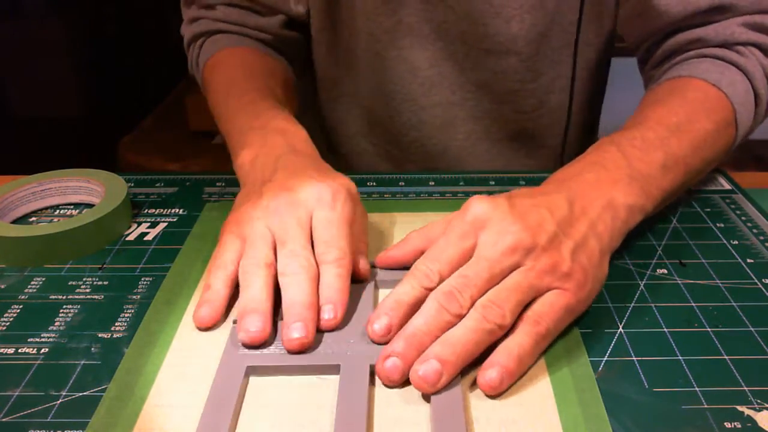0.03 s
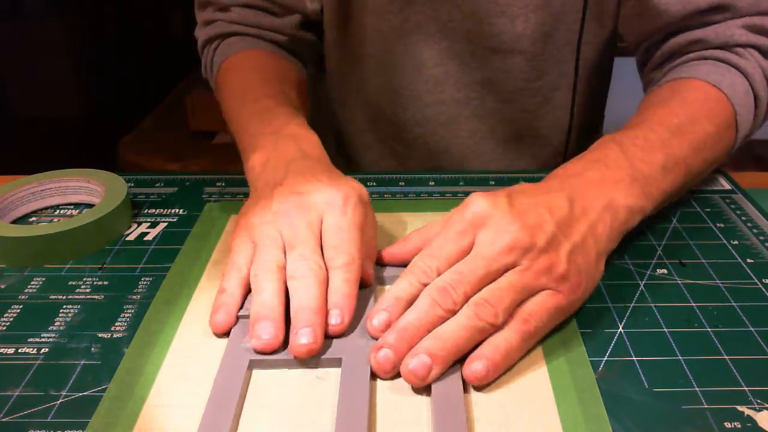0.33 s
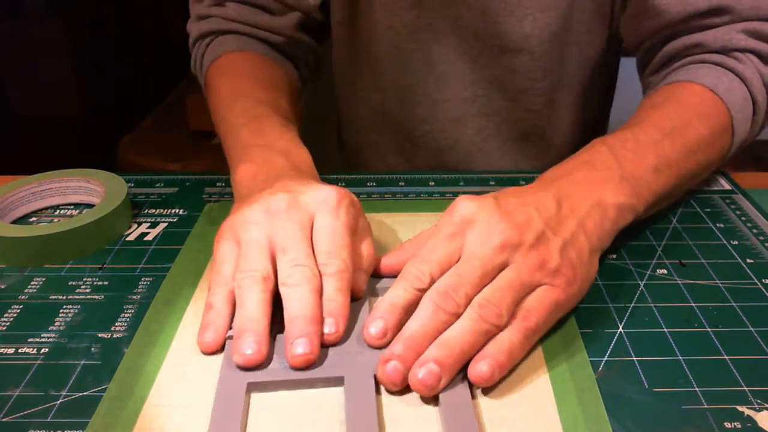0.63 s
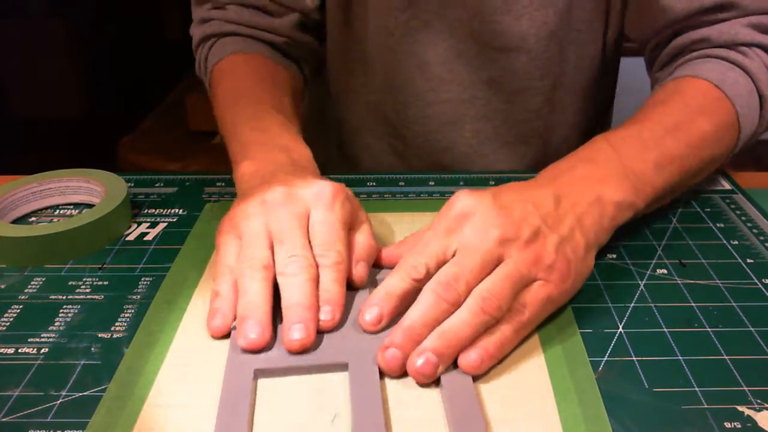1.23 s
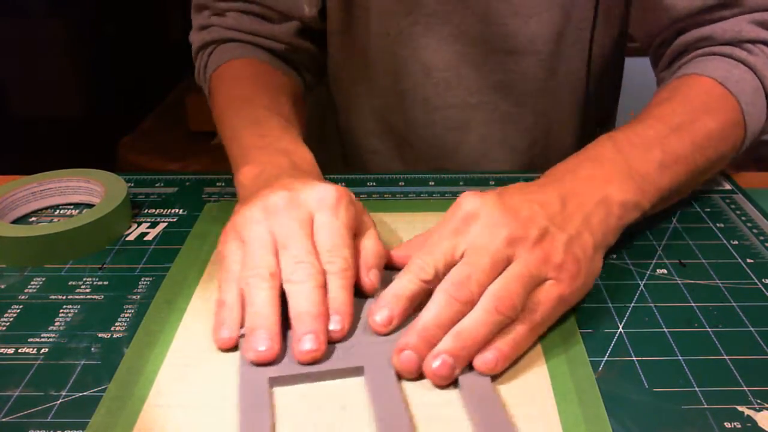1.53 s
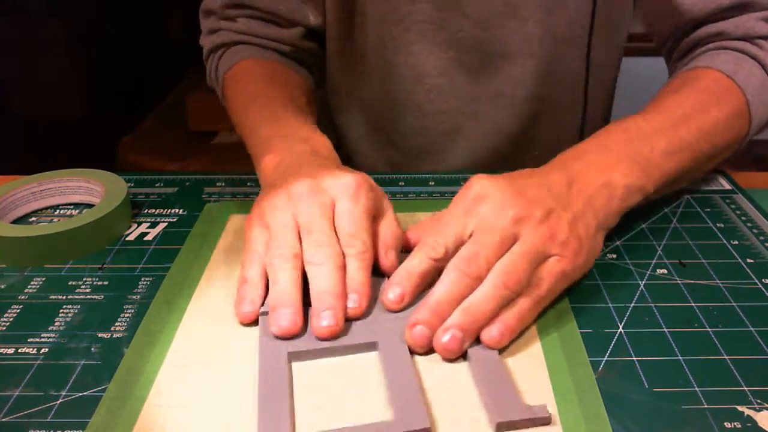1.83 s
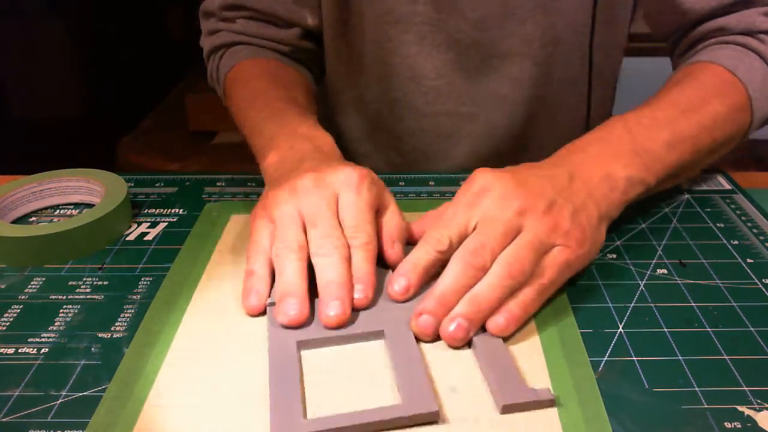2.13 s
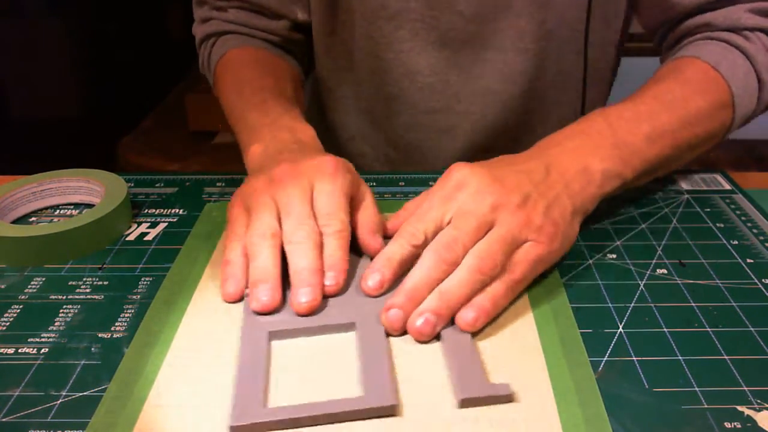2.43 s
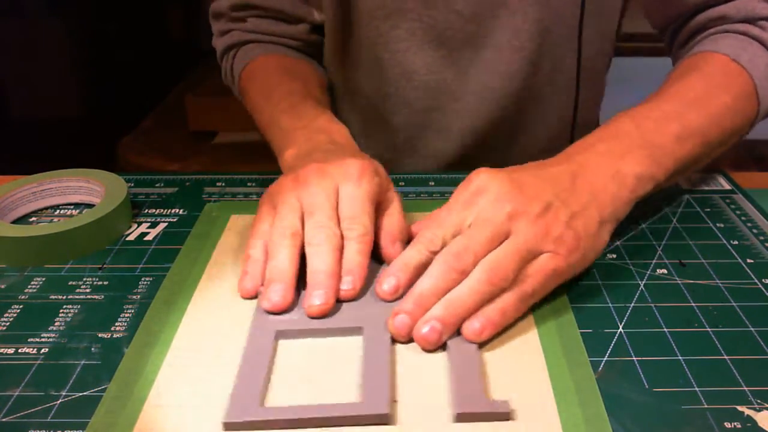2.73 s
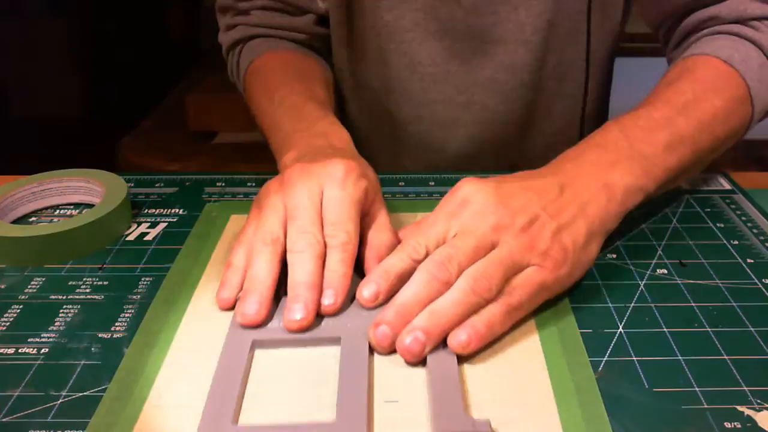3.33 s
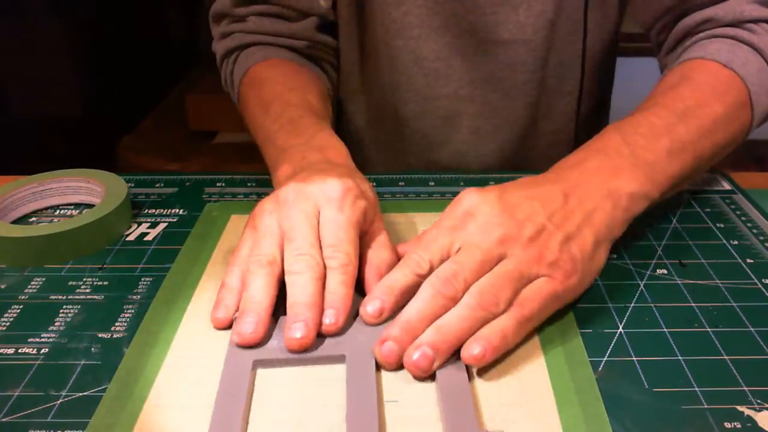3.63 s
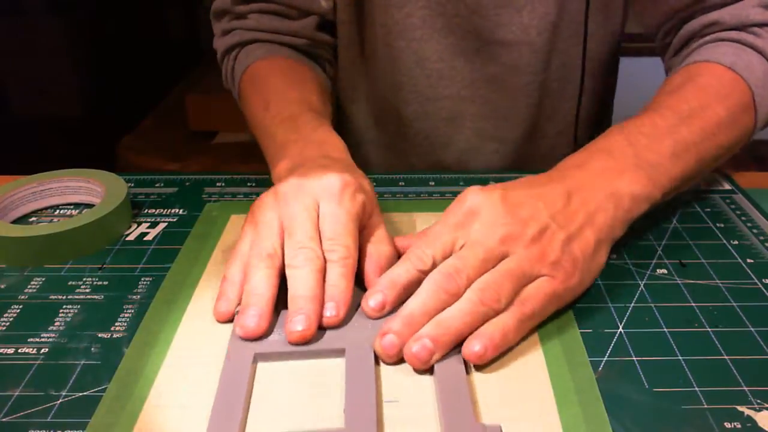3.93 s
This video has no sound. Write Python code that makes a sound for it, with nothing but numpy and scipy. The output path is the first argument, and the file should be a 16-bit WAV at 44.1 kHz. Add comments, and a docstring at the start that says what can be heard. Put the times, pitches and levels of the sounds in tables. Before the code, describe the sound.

Plastic parts rubbed back and forth on sandpaper in quick, short, rasping strokes.

```python
"""Two plastic model parts are pushed to and fro on sandpaper taped to a desk, about seven strokes a second.
Grit catches the plastic and makes it ring under the fingers; midway the hands fall out of step and the
strokes overlap. Now and then an edge snags with a tick, and dull low thuds sound under some strokes.
Behind it lies a small room with a faint hum and a thin high whine.
The close mono microphone overloads on the hardest strokes."""
import sys
import numpy as np
from scipy import signal
from scipy.fft import rfft, irfft
from scipy.io import wavfile
from scipy.ndimage import map_coordinates

SR = 44100
rng = np.random.default_rng(int(sys.argv[2]) if len(sys.argv) > 2 else 0)


def waveform_to_disk(signal):
    """Save audio, clipped to [-1, 1], as 16-bit WAV at the path in sys.argv[1]."""
    frames = np.transpose(np.atleast_2d(signal))
    scaled = np.clip(frames, -1, 1) * 32767
    samples = np.round(scaled).astype(np.int16)
    wavfile.write(sys.argv[1], SR, samples)


N = 176400


def sanding():
    """Plastic rasps over the paper in firm strokes and light slides; the desk rumbles under the push."""
    # Each row: start in seconds, length in seconds, relative level in dB, place of top speed from 0 to 1,
    # pointedness of the swell, lows, mids and treble in dB, ring pitch in Hz, ring lift in dB.
    strokes = [(0.044, 0.071, -13, 0.57, 1.05, 2.0, -8, -0.0, 720, 13),
               (0.176, 0.1, -5, 0.42, 1.03, 3, -2, -1, 3750, 5.5),
               (0.672, 0.14, -17, 0.51, 0.43, 5.5, -3, 0.5, 2350, 5.5),
               (0.873, 0.13, -12.5, 0.38, 0.56, -4.5, -1.5, -1.5, 1830, 5.5),
               (1.031, 0.12, -12.5, 0.62, 0.88, 0.5, -3, -0.5, 1340, 4.5),
               (1.185, 0.12, -12, 0.54, 0.7, -1, -2, 1, 2130, 3.5),
               (1.33, 0.11, -11.5, 0.51, 0.95, 4.5, -2.5, 0, 1160, 5.5),
               (1.464, 0.12, -11, 0.47, 1.33, -1.5, -4, -1, 1890, 6),
               (1.599, 0.12, -9.5, 0.5, 0.88, 0.0, -3.5, 1.0, 1340, 6),
               (1.712, 0.15, -12, 0.75, 0.97, 1.5, -1, 2.5, 1940, 6.5),
               (1.854, 0.16, -10.5, 0.59, 0.45, 1.5, -5.5, 0.5, 1200, 8.5),
               (1.992, 0.21, -10, 0.1, 1.87, 2, -0.5, 1.5, 2810, 3.5),
               (2.113, 0.17, -8, 0.33, 2.5, 1.5, 3, 1.5, 2780, 5.5),
               (2.241, 0.14, -7, 0.5, 1.44, 2.5, 2, 2.5, 3270, 5.5),
               (2.358, 0.14, -4.5, 0.66, 1.8, -3.5, 4, -0.5, 1370, -3),
               (2.455, 0.096, -14, 0.5, 0.55, 7, -3, 2, 1260, 4),
               (2.51, 0.15, -7.5, 0.51, 2.1, 1, -0.5, 1, 3230, 6.5),
               (2.614, 0.095, -14.5, 0.46, 0.39, 1.5, -2, 2, 1900, 6),
               (2.686, 0.12, -8.5, 0.35, 1.6, 1, 3.5, 1, 2570, 5),
               (2.768, 0.078, -13, 0.4, 1, 7.5, 2, 2, 2130, 8),
               (2.819, 0.096, -10, 0.29, 0.94, 0, -0.5, 1, 1200, 7),
               (2.895, 0.093, -14, 0.3, 0.49, -6.5, -1, 2.5, 3840, 1),
               (2.952, 0.11, -6.5, 0.37, 2.2, -2, -1, -1.5, 2660, 2),
               (3.012, 0.17, -13, 0.74, 0.37, 0.5, 0, 3, 1760, 4),
               (3.16, 0.094, -15.5, 0.45, 0.66, 1, -2, 1.0, 1640, 4),
               (3.259, 0.12, -10, 0.65, 1.3, -1, -5, 1.5, 3800, 0),
               (3.404, 0.11, -9, 0.49, 1.03, -3.0, -3.5, 0.5, 3600, 3.5),
               (3.535, 0.1, -9, 0.56, 1.23, 0.5, -2.5, 1.5, 2010, -2),
               (3.66, 0.11, -9, 0.45, 0.84, -4, -4.5, 0.5, 1810, 4.5),
               (3.773, 0.11, -9.5, 0.61, 1.6, 2.5, -5, 1.5, 2080, 4.5),
               (3.906, 0.095, -10.5, 0.41, 0.6, -1.5, -1, 2.5, 1700, 6)]
    # A part slides, hardly pressed. Each row: start in seconds, length in seconds, relative level in dB.
    slides = [(-.05, 0.1, -26), (.27, 0.044, -42), (.35, .11, -45), (.5, 0.081, -46), (3.62, 0.032, -37.5),
              (3.865, 0.037, -39)]
    # The colour of the shaking desk. Each row: frequency in Hz, relative level in dB.
    desk_spectrum = [(15, -16), (48, -13), (75, -16), (150, 26), (300, -24), (1000, -62)]
    rasp, push = np.zeros((2, N))
    for start, *gesture in list(strokes) + list(slides):
        sound, force = stroke(*gesture)
        add(rasp, start, sound)
        add(push, start, force)
    rumble = np.sqrt(push / 2) * noise(desk_spectrum)
    return amp(-0.5) * rasp + amp(-43.5) * rumble


def stroke(length, level_db, top=0.39, pointedness=1, *colour):
    """Speed rises and falls in an arch while rubbing and grains drive the part. Gives sound and force."""
    size = SR // 4
    grains_per_s, grain_spread_db, fine_share, chatter_depth = 7000, 2.5, 0.82, 0.11
    progress = np.interp(np.arange(size) / SR / length, [0, top, 1], [0, .5, 1])
    speed = np.sin(np.pi * progress).clip(0)
    chance = grains_per_s / SR * (speed + .1)
    grain_sizes = amp(grain_spread_db * np.minimum(rng.exponential(1, size), 5))
    kicks = unit(grain_sizes * rng.choice([-1, 1], size))
    grains = kicks * (rng.random(size) < chance) / np.sqrt(chance)
    grit = np.sqrt(fine_share) * rng.standard_normal(size) + np.sqrt(1 - fine_share) * grains
    press = amp(speed ** 19 - .5)  # the fingers bear down briefly around top speed
    chatter = np.exp(chatter_depth * wander(size, .004 * SR) - chatter_depth ** 2)  # stick and slip
    force = amp(level_db) * press * speed ** pointedness * chatter
    return signal.fftconvolve(grit * force, plastic_ring(*colour)), force


def plastic_ring(low_db=0, mid_db=0, treble_db=0, ring_hz=2000, ring_db=0, soft_hz=SR):
    """How the held plastic answers one grain; each grip shifts its resonances and colours one band."""
    # The broad colour of plastic on paper on the desk. Each row: frequency in Hz, relative level in dB.
    body = [(40, -31), (90, -31), (170, -25), (350, -17), (550, -10.5), (930, -9), (1100, -0.5), (1500, -6),
            (2300, 0.5), (3000, -3.5), (3800, 0), (5000, -5.5), (6200, -13), (7000, -20), (8000, -18),
            (10200, -17), (12000, -23), (15500, -29.5)]
    # The resonances of the parts. Each row: frequency in Hz, width in Hz, lift in dB.
    resonances = [(693, 17, 5), (864, 20, 6.5), (1135, 190, 3), (1381, 88, 8.5), (1745, 396, 5.5),
                  (2640, 600, 3.5), (3430, 205, 5.5), (10060, 600, 1.5)]
    ripple_db, ripple_step_hz, detune = 2.0, 69.7, 0.016  # the grip differs a little in every stroke
    hz = np.fft.rfftfreq(4096, 1 / SR)
    ripple = ripple_db * wander(len(hz), ripple_step_hz / hz[1]) / (1 + hz / 2500)
    db = curve(body, hz) + ripple
    modes = [(centre * (1 + detune * rng.standard_normal()), *rest) for centre, *rest in resonances]
    modes.append((ring_hz, 0.072 * ring_hz, ring_db))
    for centre, width, lift_db in modes:
        peak = 1 / (1 + (2 * (hz - centre) / width) ** 2)
        db += 10 * np.log10(1 + (amp(lift_db) ** 2 - 1) * peak)
    low = 1 / (1 + (hz / 790) ** 6)
    mid = np.exp(-(np.log2((hz + 1) / 1230) / 0.26) ** 2)
    treble = 1 - 1 / (1 + (hz / 4170) ** 8)
    dull_db = 10 * np.log10(1 + (hz / soft_hz) ** 4)
    return impulse_response(db + low_db * low + mid_db * mid + treble_db * treble - dull_db)


def snags():
    """An edge catches on a coarse grain: a very short burst of slips knocks the part."""
    # Each row: time in seconds, relative level in dB.
    catches = [(0.1109, -5), (0.186, -1.5), (.27, -11), (.51, -20), (.5135, -14), (.663, -25),
               (0.6764, -22), (1.873, -2), (1.978, -7), (2.815, -4), (2.918, -5)]
    out, t = np.zeros(N), np.arange(SR // 100) / SR
    for start, db in catches:
        burst = rng.standard_normal(len(t)) * np.exp(-t / 0.002)
        ring = plastic_ring(low_db=-9, mid_db=-9, treble_db=-3.5, ring_hz=1890, ring_db=4.5, soft_hz=7100)
        tick = signal.fftconvolve(burst, ring)
        add(out, start, amp(db + 13.5) * tick / np.linalg.norm(tick))
    return out


def low_thuds():
    """Short, dull low thuds sound under some strokes, strongest on the hardest ones."""
    # Each row: centre in seconds, length in seconds, pitch in Hz, level in dB.
    thuds = [(0.22, 0.027, 175, -31.5), (.225, 0.036, 55, -42), (.91, .12, 48, -47),
             (1.137, 0.04, 190, -39), (1.21, 0.062, 48, -46), (2.19, .04, 82, -48),
             (2.453, 0.043, 280, -34), (3.004, 0.025, 170, -33.5), (3.0, 0.033, 55, -39)]
    out, t = np.zeros(N), np.arange(N) / SR
    for centre, length, hz, db in thuds:
        band = noise([(hz / 4, -40), (hz * .7, -3), (hz, 0), (hz * 1.3, -4), (hz * 3, -45), (hz * 12, -90)])
        swell = np.exp(-(2 * (t - centre) / length) ** 2)
        out += amp(db) * band * swell
    return out


def room_echo(sound):
    """Quick reflections from the desk and a weak tail from the small room."""
    # Each row: frequency in Hz, seconds for the tail to fall by 60 dB.
    decay_times = [(200, 0.9), (700, 0.68), (2000, 0.31), (5000, 0.31), (12000, 0.36)]
    early_db, tail_db = -16.5, -22
    t = np.arange(SR // 2) / SR
    early = rng.standard_normal(len(t)) * np.exp(-t / 0.011) * (t > .001)
    hz, age, spectra = signal.stft(rng.standard_normal(len(t)), SR, nperseg=256)
    fade = amp(-60 * age / curve(decay_times, hz)[:, None])
    tail = signal.istft(spectra * fade, SR, nperseg=256)[1][:len(t)]
    echo = amp(early_db) * early / np.linalg.norm(early) + amp(tail_db) * tail / np.linalg.norm(tail)
    return signal.fftconvolve(sound, echo)[:N]


def room_tone():
    """A low bed of noise, with a faint hum and a thin high whine that wavers in level."""
    # The colour of the bed. Each row: frequency in Hz, relative level in dB.
    bed_spectrum = [(20, 0), (50, 0), (80, -4), (140, 4), (220, -2), (470, -2), (700, -11), (1500, -16),
                    (4000, -20), (7000, -28), (15500, -29)]
    hum_hz, whine_hz = 452, 8000
    t = np.arange(N) / SR
    waver = unit(np.clip(1 + 0.93 * wander(N, .014 * SR), 0, 2))
    hum = amp(-59) * unit(np.sin(2 * np.pi * hum_hz * t))
    whine = amp(-67) * waver * unit(np.sin(2 * np.pi * whine_hz * t))
    return amp(-48) * noise(bed_spectrum) + hum + whine


def amp(db):
    """Decibels to gain."""
    return 10 ** (np.asarray(db) / 20)


def unit(x):
    """Scales to rms 1."""
    return x / np.sqrt(np.mean(x ** 2) + 1e-20)


def curve(points, hz):
    """Reads a table on a log-frequency axis."""
    knots_hz, values = np.transpose(points)
    return np.interp(np.log(hz + 1), np.log(knots_hz + 1), values)


def add(mix, start, sound):
    """Mixes a sound in at a start time in seconds."""
    at = round(start * SR)
    sound = sound[max(-at, 0):]
    span = mix[max(at, 0):][:len(sound)]
    span += sound[:len(span)]


def noise(points):
    """Steady noise of rms 1, coloured by points of frequency in Hz and level in dB."""
    gain = amp(curve(points, np.fft.rfftfreq(N, 1 / SR)))
    return unit(irfft(rfft(rng.standard_normal(N)) * gain, N))


def wander(size, step):
    """A smooth random drift that takes a new value every step samples."""
    at = np.arange(size) / max(step, 1)
    return unit(map_coordinates(rng.standard_normal(size), [at], order=2, mode="mirror"))


def impulse_response(db):
    """A minimum-phase ring of energy 1 with this spectral shape."""
    log_gain = np.log(amp(np.r_[db, db[-2:0:-1]]))
    spectrum = np.exp(np.conj(signal.hilbert(log_gain)))
    response = np.fft.ifft(spectrum).real[:len(db)]
    return response / np.linalg.norm(response)


def scene():
    """The work at the desk and the room around it, the same in both channels."""
    direct = sanding() + snags() + low_thuds()
    mono = direct + room_echo(direct) + room_tone()
    return np.array([mono, mono])


def record(dry):
    """The microphone clips the loudest peaks with a firm knee, and the highest treble is cut off."""
    drive_db, knee, cutoff_hz = 1.5, 22, 15800
    driven = dry * amp(drive_db)
    clipped = driven / (1 + abs(driven) ** knee) ** (1 / knee)
    lowpass = signal.firwin(511, cutoff_hz, window=("kaiser", 9), fs=SR)
    return signal.oaconvolve(clipped, lowpass[None], "same")


dry = scene()
out = record(dry)
waveform_to_disk(out)
```